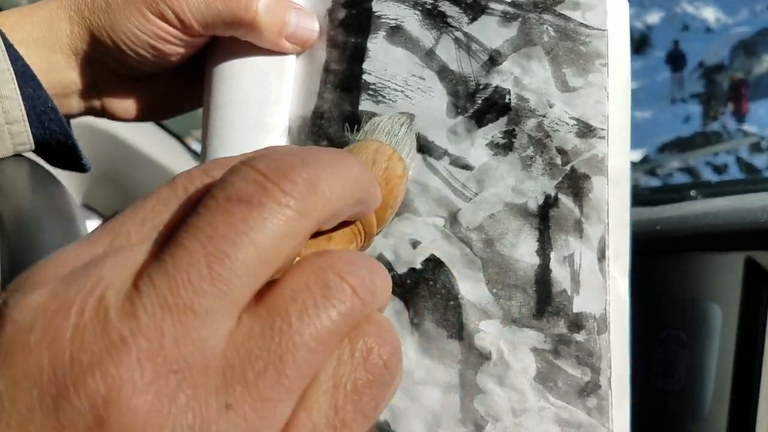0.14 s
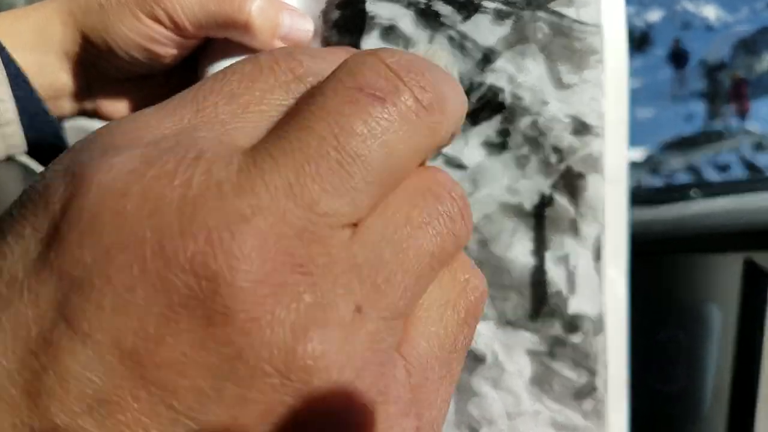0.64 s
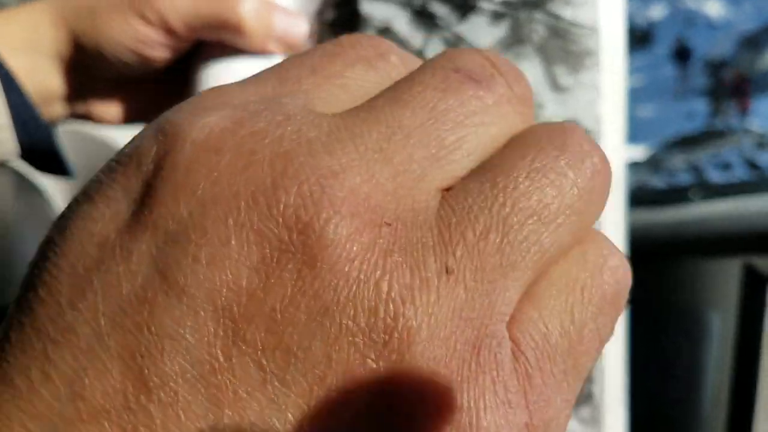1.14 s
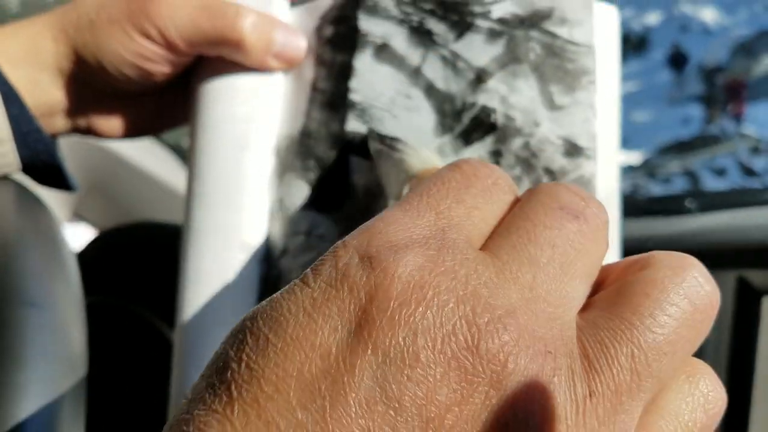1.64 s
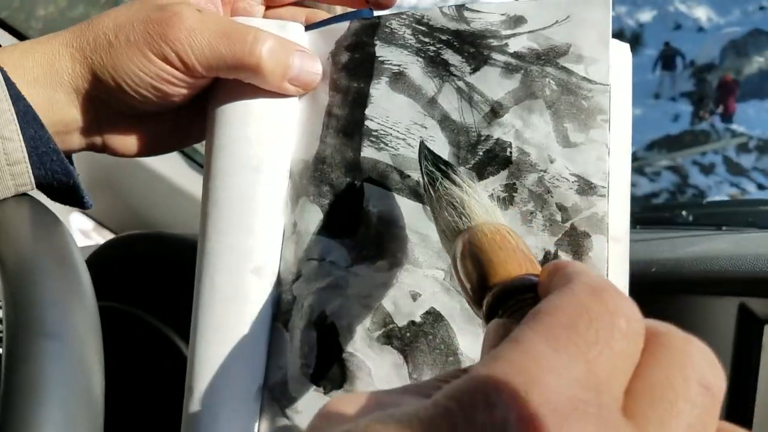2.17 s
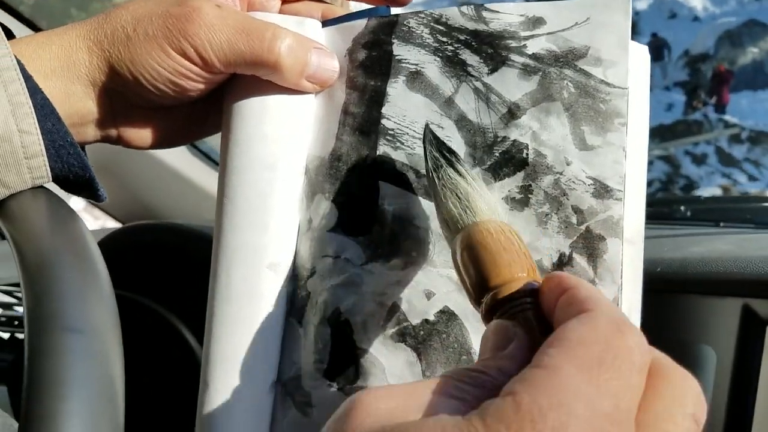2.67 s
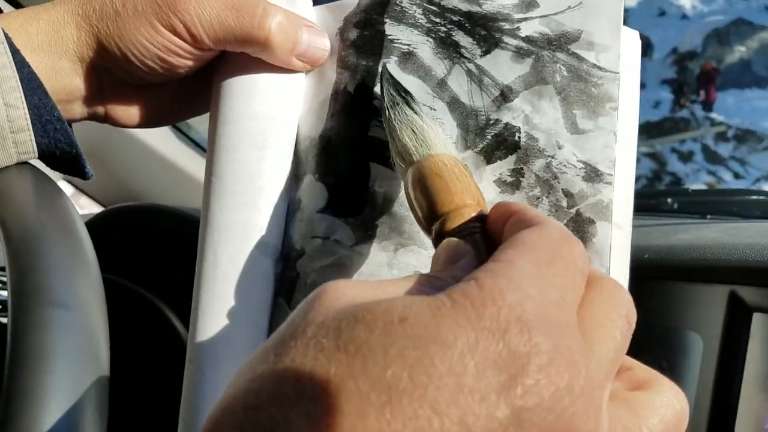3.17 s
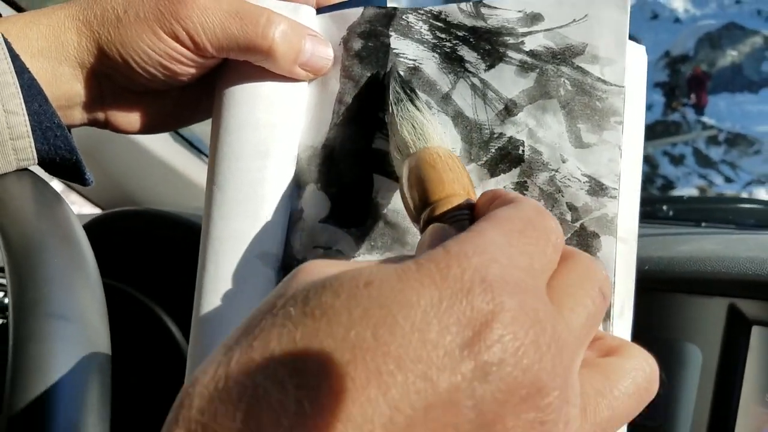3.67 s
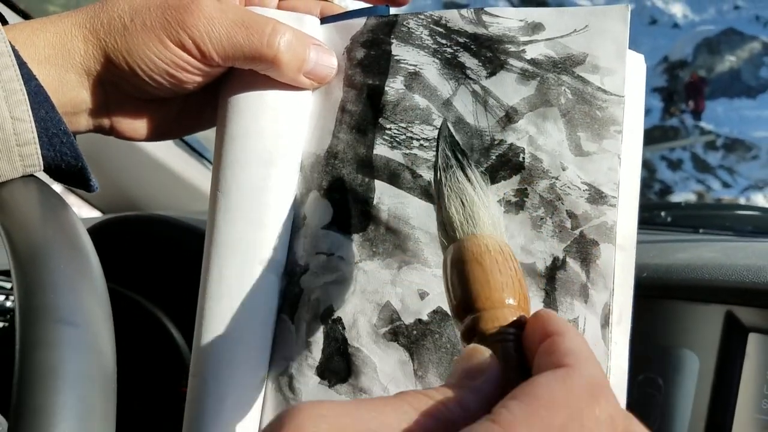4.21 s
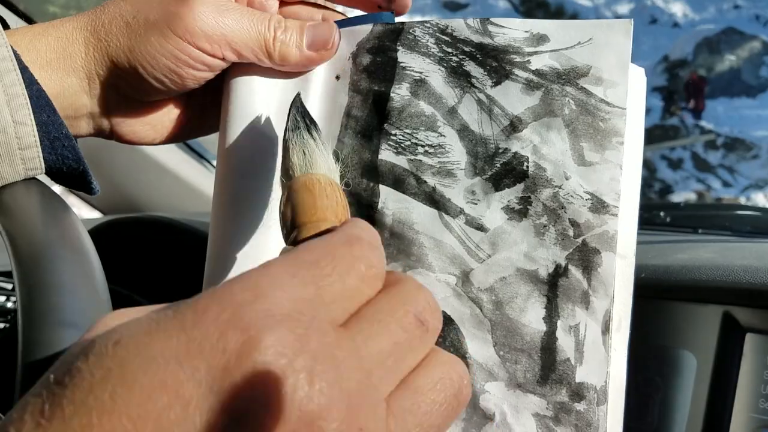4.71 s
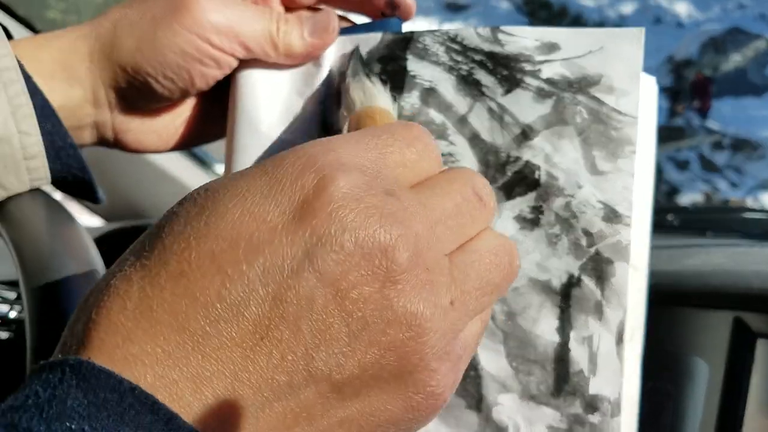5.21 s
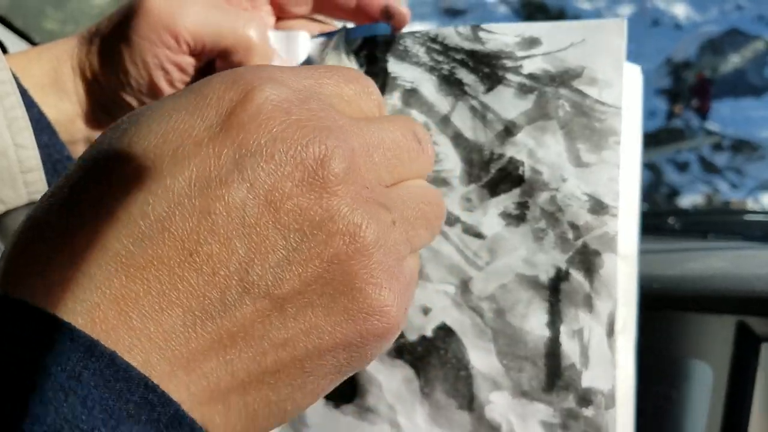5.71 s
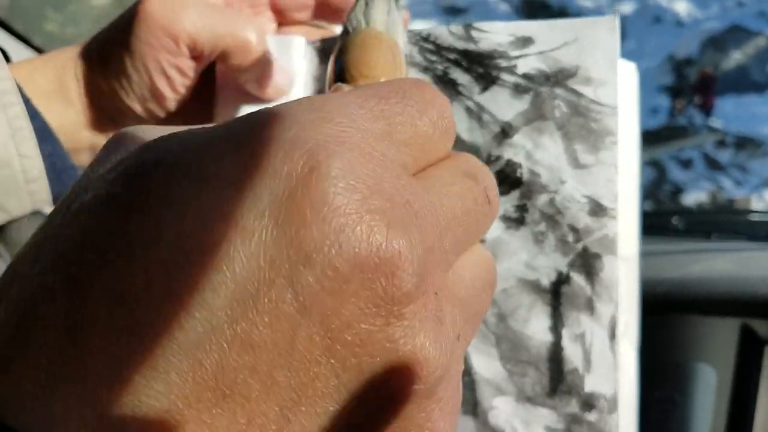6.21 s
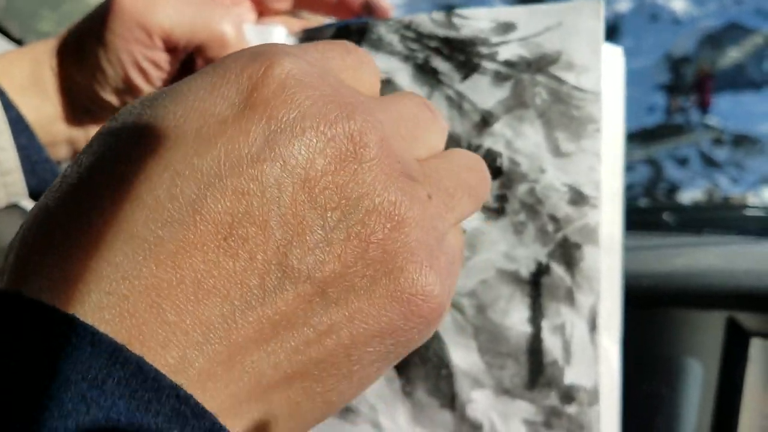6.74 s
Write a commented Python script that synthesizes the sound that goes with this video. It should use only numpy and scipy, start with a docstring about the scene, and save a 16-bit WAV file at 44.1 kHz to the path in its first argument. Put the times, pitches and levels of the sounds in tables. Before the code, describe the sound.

A parked car idles with a steady bassy hum, vent rumble and faint hiss, while a fan spins up and settles. Near the phone, a soft brush barely grazes a paper pad, then scratches it in short airy bursts. Small papery ticks and a brief faint squeak come between the strokes. The busiest brushing comes around five seconds, then a lull and final strokes.

```python
"""A soft paint brush is dabbed and dragged over a paper pad inside a parked car, close to a phone.
Noise clicks stand for hairs slipping: they hiss, scrape and ring the paper; ticks are short bursts into it.
The engine idles: sine tones follow its firing rate and boom in the cabin, and each firing knocks the panels.
A cooling fan spins up as two more sines and beats against them; filtered noise makes the air rumbling
in the vents and the faint microphone hiss."""
import sys
import numpy as np
from scipy import signal
from scipy.fft import rfft, irfft
from scipy.io import wavfile
from scipy.ndimage import uniform_filter1d

SR = 44100
rng = np.random.default_rng(int(sys.argv[2]) if len(sys.argv) > 2 else 0)


def to_linear_factor(level_db):
    """Convert decibel levels (scalar or array-like) to linear amplitude factors."""
    exponent = np.asarray(level_db, float) / 20
    return 10 ** exponent


def wav_out(sig):
    """Save sig, one row per channel (or a flat mono array), as 16-bit PCM at SR to the path in sys.argv[1]."""
    wavfile.write(sys.argv[1], SR, np.round(np.clip(np.atleast_2d(sig).T, -1, 1) * 32767).astype(np.int16))


N = 302526  # length in samples

# left-right lean of the paper: minus makes the left port quieter
PAPER_PAN = to_linear_factor(-1 * np.array([[0.5], [-0.5]]))


def level(x, db):
    """Scale a sound to an rms level in dB."""
    return x * to_linear_factor(db) / np.sqrt(np.mean(x ** 2))


def curves(rows):
    """Draw straight lines between the rows of a timed table: one curve for each column after the time."""
    s, *columns = np.transpose(rows)
    return [np.interp(np.arange(N) / SR, s, column) for column in columns]


def on_log(rows, hz):
    """Read a spectrum between its rows, along a log-frequency axis."""
    f, value = np.transpose(rows)
    return np.interp(np.log(hz + 1), np.log(f + 1), value)


def colour(x, spectrum):
    """Make some frequencies of a sound louder and others softer."""
    gain = to_linear_factor(on_log(spectrum, np.fft.rfftfreq(N, 1 / SR)))
    return irfft(rfft(x) * gain, N)


def ring(x, modes):
    """Pass a sound through side-by-side resonances, each with a pitch, a width and a gain."""
    out = 0
    for hz, width, db in modes:
        b, a = signal.iirpeak(min(hz, 20000), hz / width, fs=SR)
        out = out + to_linear_factor(db) * signal.lfilter(b, a, x)
    return out


def walk(rate):
    """Wander randomly: levels held for 1 / rate seconds, smoothed twice, with a spread near 1."""
    k = int(SR / rate)
    steps = np.repeat(rng.standard_normal(N // k + 1), k)
    return 1.3 * uniform_filter1d(uniform_filter1d(steps, k), k)[:N]


def tone(cycles, db):
    """A sine of given rms level, following a running count of cycles."""
    return np.sqrt(2) * to_linear_factor(db) * np.cos(2 * np.pi * cycles)


def reflections(x, t60, wet_db):
    """Seats and glass send each port its own short scatter of echoes, fading by 60 dB in t60 seconds."""
    t = np.arange(4000) / SR
    tail = rng.standard_normal((2, len(t))) * np.exp(-np.log(1000) * t / t60)
    tail *= to_linear_factor(wet_db) / np.sqrt(np.sum(tail ** 2, axis=1, keepdims=True))
    tail[:, 0] = 1  # direct sound
    both = signal.fftconvolve(x * np.ones((2, 1)), tail, axes=1)[:, :N]
    return both / np.sqrt(1 + to_linear_factor(2 * wet_db))


def slips(flutter_db):
    """Hundreds of hairs slip over the paper grain: dense clicks of uneven size, in uneven bunches."""
    size_db = 1.3 * rng.exponential(size=N)
    return rng.standard_normal((2, N)) * to_linear_factor(size_db + flutter_db * walk(60))


def contact():
    """Hovering tips plus strokes that speed up and slow down evenly; a faster brush is louder.
    Gives the amplitudes of hiss, scrape and paper body, and the sheet's pitch in Hz."""
    # Brush strokes. Each row: touch in seconds, fastest moment in seconds, lift in seconds,
    # bristle hiss at the fastest moment in dB, pressure (paper body over hiss) in dB, scrape over hiss in dB.
    strokes = [(1.689, 1.749, 1.783, -60, -9, -7), (2.288, 2.309, 2.352, -59, -16, -3),
               (2.786, 2.824, 2.904, -52, -7, -5), (2.882, 2.913, 2.958, -63, -8, -5),
               (3.045, 3.067, 3.138, -50, -7, -6), (3.219, 3.291, 3.348, -50, -7, -7),
               (3.308, 3.427, 3.475, -56, -4, -8), (3.454, 3.504, 3.559, -52, -7, -8),
               (3.551, 3.588, 3.659, -55, -6, -7), (3.65, 3.667, 3.725, -50, -7, -11),
               (3.84, 3.97, 4.13, -74, 11, -6), (4.19, 4.22, 4.25, -70, 7, -8),
               (4.43, 4.508, 4.565, -56, -4, -6), (4.61, 4.635, 4.69, -68, 10, -4),
               (4.627, 4.672, 4.706, -56, -3, -8), (4.666, 4.724, 4.911, -55, -2, -7),
               (4.861, 4.919, 4.939, -54, -5, -6), (4.935, 5.009, 5.065, -47, -7, -8),
               (5.043, 5.107, 5.138, -52, -6, -8), (5.099, 5.176, 5.223, -50, -6, -9),
               (5.203, 5.279, 5.334, -57, -11, -11), (5.318, 5.359, 5.411, -54, -4, -9),
               (5.378, 5.421, 5.534, -42, -9, -10), (5.519, 5.563, 5.609, -62, -7, -9),
               (5.589, 5.65, 5.712, -51, -6, -8), (5.635, 5.66, 5.72, -60, 12, -2),
               (5.65, 5.71, 5.78, -52, 3, -3), (5.73, 5.792, 5.844, -52, -6, -10),
               (5.88, 5.915, 5.946, -59, -6, -13), (6.676, 6.719, 6.798, -59, -4, -9),
               (6.72, 6.78, 6.86, -59, 0, -7), (6.794, 6.847, 6.906, -52, -6, -10)]
    # Tips barely touching the paper. Each row: time in seconds, bristle hiss in dB.
    hover = [(0, -83), (.55, -82), (.7, -70), (.85, -80), (1.4, -86), (1.65, -72.5), (1.95, -72),
             (2.15, -66.5), (2.28, -69.5), (2.5, -78), (2.7, -66.5), (3, -72.5), (3.8, -68), (4.15, -71.5),
             (4.4, -68.5), (5.9, -69.5), (6.3, -72), (6.86, -80)]

    def powers(pressure_db, scrape_db):
        """Powers of hiss, scrape and body, and the body power weighted by pressure."""
        body = to_linear_factor(2 * pressure_db)
        return np.array([1, to_linear_factor(2 * scrape_db), body, body * pressure_db])[:, None]

    t = np.arange(N) / SR
    hover_db, = curves(hover)
    total = powers(-3.5, -5.5) * to_linear_factor(2 * hover_db)
    for touch, fastest, lift, db, pressure_db, scrape_db in strokes:
        during = slice(int(touch * SR), int(lift * SR))
        speed = np.interp(t[during], [touch, fastest, lift], [0, 1, 0])
        total[:, during] += powers(pressure_db, scrape_db) * to_linear_factor(2 * db) * speed ** 2
    tips, stiff, body = np.sqrt(total[:3])
    mean_pressure_db = total[3] / total[2]
    # 1736 Hz at pressure 0, higher by 0.03 octaves for each dB of pressure
    return tips, stiff, body, 1736 * 2 ** (0.03 * mean_pressure_db)


def sheet(x, pitch_hz, spread):
    """The sheet resonates, most near the touched spot's pitch (spread in octaves); wide resonances are lower."""
    # Resonances of the paper sheet. Each row: frequency in Hz, width in Hz, relative level in dB.
    paper = [(695, 200, -5), (956, 195, 3.5), (1276, 266, 4.5), (1480, 146, 2), (1750, 115, 1.5),
             (1956, 327, 5.5), (2220, 310, -5.5), (2920, 400, -9)]
    out = 0
    for hz, width, db in paper:
        woken = np.exp(-(np.log2(hz / pitch_hz) / spread) ** 2 / 2)
        rung = ring(ring(x, [(hz, width, db)]), [(hz, 3 * width, 0)])  # second pass narrows the skirts
        out = out + woken * rung / np.sqrt(width)
    return out


def brush():
    """Hair tips hiss, stiffer hairs scrape, and the sheet and its backing resonate under the drag."""
    # Colour of the hair-tip hiss. Each row: frequency in Hz, relative level in dB.
    bristles = [(4120, -38), (7000, -18.5), (8460, -8.5), (9900, -6), (10400, -2), (13600, 1), (15000, 3)]
    # Resonances of the stiffer hairs. Each row: frequency in Hz, width in Hz, relative level in dB.
    stiff_hairs = [(3580, 4400, 14), (5170, 2000, -21), (6860, 6800, -6)]
    # Backing of the pad, pushed by the drag. Each row: frequency in Hz, width in Hz, relative level in dB.
    backing = [(496, 110, -7), (660, 84, -3), (920, 730, -6.5)]

    tips, stiff, body, pitch_hz = contact()
    # the levels below balance the layers; the contact amplitudes then shape each one
    hiss = level(colour(slips(2.0), bristles), 0.86) * tips
    scrape = level(ring(slips(2.5), stiff_hairs), -2.2) * stiff
    paper = level(sheet(slips(1.4), pitch_hz, spread=0.56), -2.14) * PAPER_PAN
    board = level(ring(ring(slips(1.8)[0], backing), [(670, 920, 0)]), -9)  # alike at both ports
    return hiss + scrape + (paper + board) * body


def pad():
    """Each tick is a sharp first contact and a brief rattle of clicks into the sheet's resonances."""
    # Snaps over many resonances of the pad. Each row: start in seconds, peak level of the body in dB,
    # rattle decay in seconds, gain of the bright edge in dB, pitch in Hz.
    snaps = [(1.4125, -56, .004, -13, 1500), (1.962, -60, .006, -12, 2300), (3.054, -57, 0.0065, 0, 2000),
             (4.429, -40.5, 0.012, -9, 1800), (5.414, -39.5, 0.01, -7, 950), (5.5, -43.5, 0.003, -8, 1100),
             (5.904, -65, .004, 3, 1500)]
    # Ticks and creaks on one resonance. Each row: start in seconds, peak level of the body in dB,
    # rattle decay in seconds, gain of the bright edge in dB, pitch in Hz.
    creaks = [(2.299, -67, .012, 0, 2750), (3.829, -55, .006, -7, 1480), (3.919, -47.5, 0.0037, -1.5, 1750),
              (4.145, -50, 0.018, -25, 700), (4.355, -63, .015, -20, 1480), (4.43, -41, .008, -23, 956),
              (4.628, -52, 0.011, -15, 2300), (5.815, -57, 0.0091, -15, 1200)]
    # Bright edge of a tick. Each row: frequency in Hz, width in Hz, relative level in dB.
    bright_edge = [(3350, 1800, 4.5), (12500, 6400, -4.5)]

    snap_spread, creak_spread = 1, 0.088  # octaves of resonances woken
    first_contact = 5.3  # size of the first click over the rattle
    t = np.arange(6000) / SR
    ticks = [(*row, snap_spread) for row in snaps] + [(*row, creak_spread) for row in creaks]
    out = np.zeros((2, N))
    for start, db, rattle, bright_db, pitch_hz, spread in ticks:
        burst = rng.standard_normal((2, len(t))) * np.exp(-t / rattle)
        edge = ring(burst, bright_edge)
        burst[:, 0] += first_contact
        body = sheet(burst, pitch_hz, spread)
        body /= np.sqrt(np.mean(np.max(body ** 2, axis=1)))  # peak of 1
        i = int(start * SR)
        out[:, i:i + len(t)] += to_linear_factor(db) * (body + to_linear_factor(bright_db) * edge)
    return reflections(out * PAPER_PAN, t60=0.025, wet_db=-5)


def squeaks():
    """The pad squeaks faintly by steady stick-slip: a thin tone that wavers in pitch and level."""
    # Squeaks of the pad. Each row: start in seconds, length in seconds, level in dB, pitch in Hz.
    squeak_list = [(3.898, .058, -68, 1750), (3.96, .08, -67, 1740)]
    t = np.arange(N) / SR
    out = np.zeros(N)
    for start, length, db, hz in squeak_list:
        fade_in, fade_out = (t - start) / 0.008, (start + length - t) / 0.032
        held = np.clip(np.minimum(fade_in, fade_out), 0, 1)
        cycles = np.cumsum(hz * (1 + 0.0118 * walk(120))) / SR
        out += held * tone(cycles, db + 2.2 * walk(80))
    return reflections(out, t60=0.03, wet_db=1)


def engine():
    """Firing tones at multiples of the firing rate, plus one uneven knock a firing that rings the panels."""
    # Idle speed. Each row: time in seconds, firing rate in Hz.
    idle = [(0, 35.664), (0.4, 35.784), (0.8, 36.362), (1.2, 37.085), (1.6, 37.168), (2, 37.009),
            (2.5, 36.616), (3, 36.587), (3.5, 36.588), (4, 36.616), (4.6, 36.651), (5.2, 36.732),
            (5.8, 36.926), (6.3, 36.919), (6.86, 36.66)]
    # Wandering tones. Each row: time in seconds, firing tone in dB, second harmonic in dB,
    # belt-driven tone in dB.
    tone_levels = [(0, -70, -48, -52), (.5, -62, -55, -55), (1.2, -47, -51, -67), (1.7, -47, -62, -55.5),
                   (2.5, -49.5, -67, -54.5), (3, -52, -48, -58.5), (4, -50.5, -52, -52),
                   (5.2, -51, -53, -53), (6, -51, -59, -51), (6.86, -51, -66, -54)]
    # Further engine tones. Each row: multiple of the firing rate, level in dB, waver in dB.
    further_tones = [(2.83, -59.5, 6), (6, -60, 1.5), (8, -65.5, 3)]
    # Cabin panels rung by each firing. Each row: frequency in Hz, width in Hz, level in dB.
    cabin_panels = [(288, 170, -65), (603, 68, -66.5), (700, 33, -70.5)]

    hz, = curves(idle)
    first_db, second_db, belt_db = curves(tone_levels)
    boom_db = -46 + 3.5 * np.minimum(hz - 36.6, 0)  # third-harmonic boom, weaker when the idle is slower
    cycles = np.cumsum(hz) / SR
    out = tone(cycles, first_db + 1.4 * walk(6))
    out += tone(2 * cycles + rng.random(), second_db + 2.0 * walk(4.99))
    out += tone(3 * cycles, boom_db + 0.54 * walk(8))
    out += tone(4.13 * cycles, belt_db + 2.7 * walk(7))  # belt tone
    for multiple, db, waver_db in further_tones:
        out += tone(multiple * cycles + rng.random(), db + waver_db * walk(3.13))

    firing = np.diff(np.floor(cycles), prepend=0)  # one click a cycle
    knock = firing * to_linear_factor(2.3 * rng.standard_normal(N))
    panels = np.zeros(N)
    for f, width, db in cabin_panels:
        rung = ring(ring(knock, [(f, width, 0)]), [(f, 2 * width, 0)])
        panels += level(rung, db)
    return out + reflections(panels, t60=0.09, wet_db=-4)


def fan():
    """Two rotor tones rise together as the speed closes in on full speed; a slower fan is quieter."""
    start_hz, full_hz, spin_up_s = 56.67, 123.73, 1.758
    full_db, db_per_hz = -46.5, 0.65
    short_hz = (full_hz - start_hz) * np.exp(-np.arange(N) / SR / spin_up_s)  # still missing from full speed
    db = full_db - db_per_hz * short_hz
    cycles = np.cumsum(full_hz - short_hz) / SR
    # the second rotor turns 1.2 times as fast and does not fade as far at low speed
    second_db = np.maximum(db, -52) - 17.5 + 3.4 * walk(4.07)
    return tone(cycles, db) + tone(1.2 * cycles, second_db)


def cabin():
    """Air rumble: coloured noise, alike at both ports in the bass and largely unrelated in the treble."""
    # Colour of the cabin air. Each row: frequency in Hz, relative level in dB.
    air_colour = [(15, -32), (25, -7), (69, -10.5), (117, -4.5), (178, -14.5), (294, -14.5), (345, -19),
                  (413, -20), (525, -32), (592, -28), (709, -25), (1020, -35.5), (1270, -34), (3000, -45),
                  (3900, -85), (6600, -120)]
    # Likeness of the two ports. Each row: frequency in Hz, left-right likeness (1 = the same, 0 = unrelated).
    likeness = [(60, 1), (130, 0.8), (290, 0.84), (640, 0.27), (1410, -0.24), (3100, 0.11), (6820, -0.28),
                (15000, 0.27)]
    hz = np.fft.rfftfreq(N, 1 / SR)
    mid, side = rfft(rng.standard_normal((2, N)))
    alike = np.clip(on_log(likeness, hz), -0.9, 0.99)
    pair = np.sqrt(1 + alike) * mid + np.sqrt(1 - alike) * side * np.array([[1], [-1]])
    air = level(irfft(pair * to_linear_factor(on_log(air_colour, hz)), N), -47)
    swell_db = 0.24 * (np.arange(N) - N / 2) / SR  # grows slowly, by 0.24 dB a second
    return air * to_linear_factor(swell_db)


def microphone_hiss():
    """Steady hiss, unrelated at the two ports, that rises toward the port resonance."""
    # Colour of the microphone hiss. Each row: frequency in Hz, relative level in dB.
    hiss_colour = [(1650, -30), (2800, -7.5), (3970, -7), (4230, -8.5), (4670, -10), (5090, -12),
                   (6210, -14.5), (8480, -17.5), (10600, -13.5), (11800, -8.5), (15300, -5)]
    return level(colour(rng.standard_normal((2, N)), hiss_colour), -67.5)


def scene():
    """All sources, added at the two microphone ports."""
    return brush() + pad() + squeaks() + engine() + fan() + cabin() + microphone_hiss()


def band_limit(x):
    """A steep low-pass at the top of the band."""
    return signal.sosfilt(signal.butter(12, 16340, fs=SR, output="sos"), x)


def record(dry):
    """The two ports differ a little in colour; the deepest bass and the top are cut."""
    # Balance of the two ports. Each row: frequency in Hz, left minus right in dB.
    port_balance = [(60, -2.5), (110, -2), (200, -2), (380, -1.5), (700, -1), (1290, -4), (2380, -4),
                    (4400, -1.5), (8120, 2), (15000, 1.0)]
    half_db = on_log(port_balance, np.fft.rfftfreq(N, 1 / SR)) / 2
    x = irfft(rfft(dry) * to_linear_factor(half_db * np.array([[1], [-1]])), N)
    x = signal.sosfilt(signal.butter(4, 31, "highpass", fs=SR, output="sos"), x)
    x = signal.sosfilt(signal.ellip(12, 0.1, 70, 15720, fs=SR, output="sos"), x)
    return band_limit(x)


dry = scene()
out = record(dry)
wav_out(out)
```